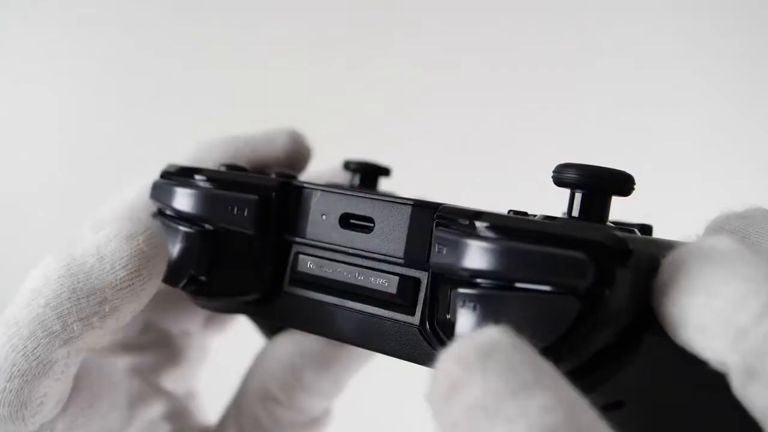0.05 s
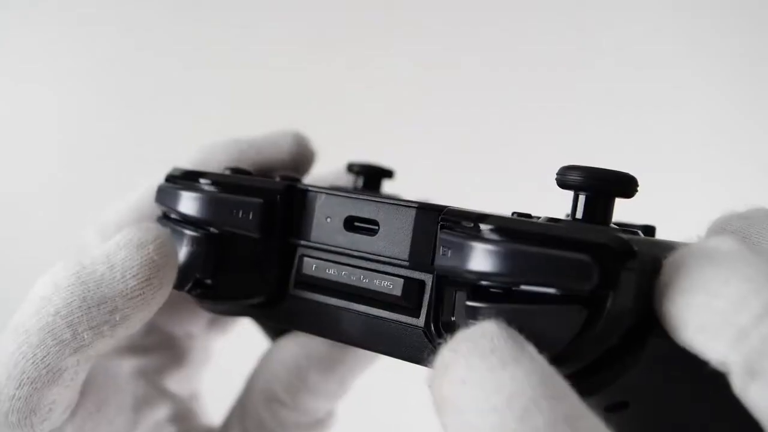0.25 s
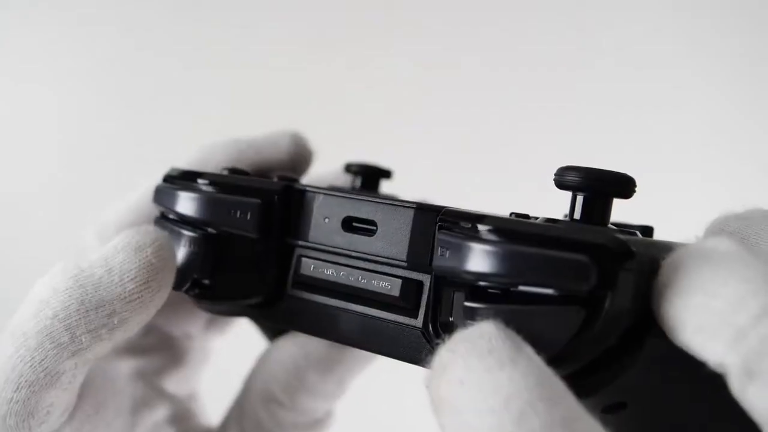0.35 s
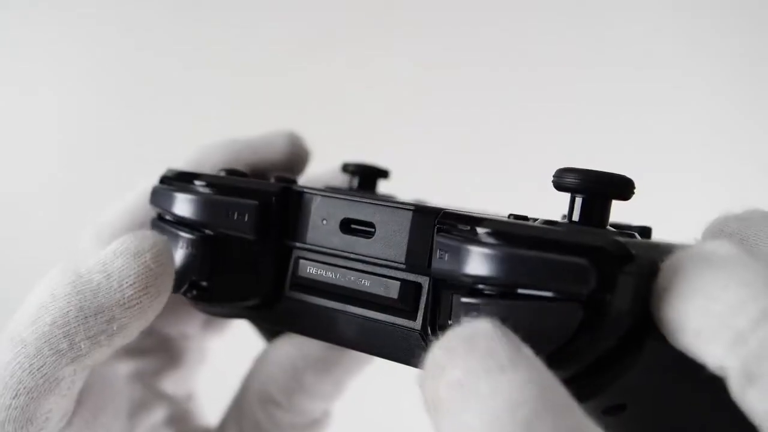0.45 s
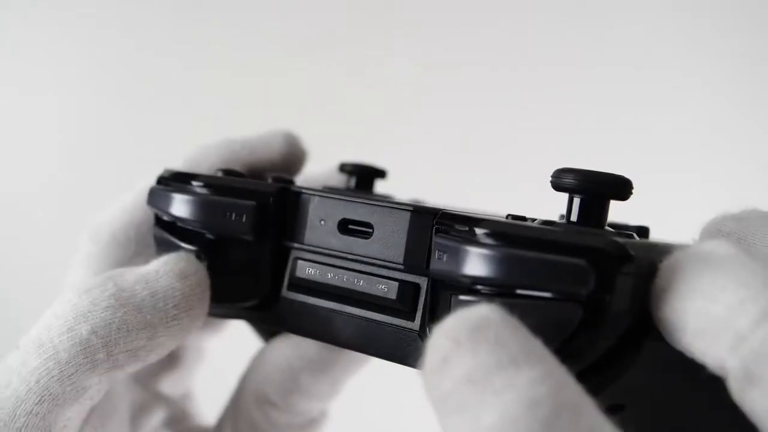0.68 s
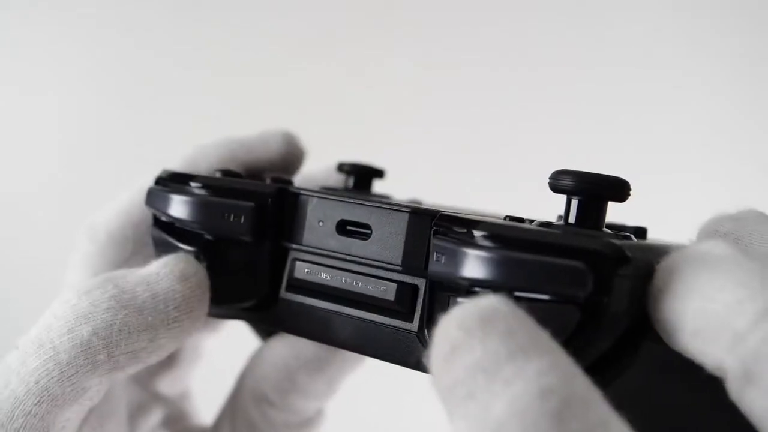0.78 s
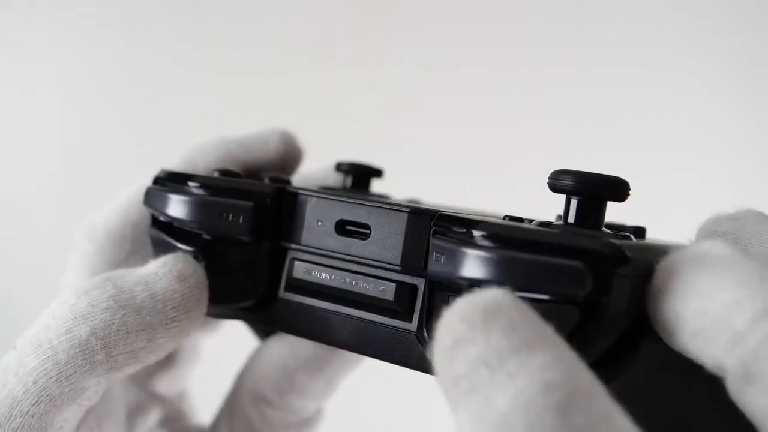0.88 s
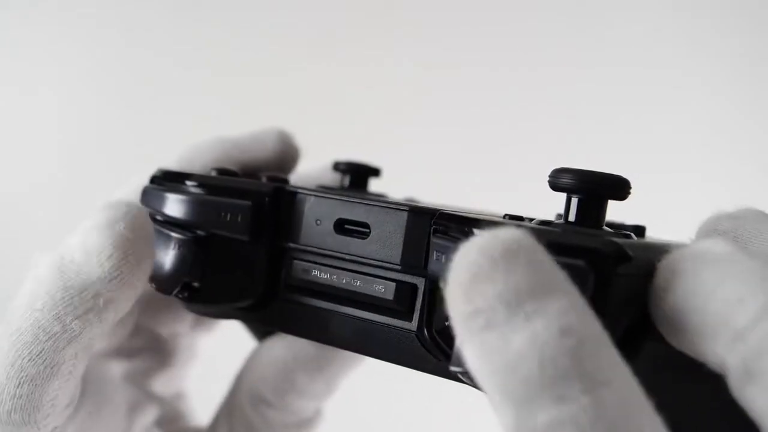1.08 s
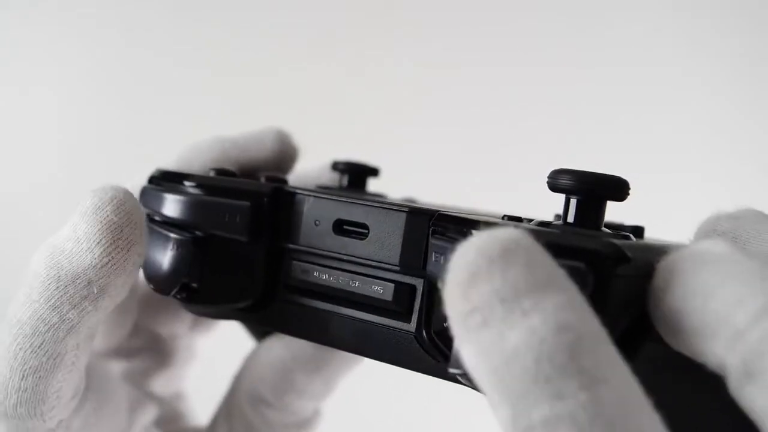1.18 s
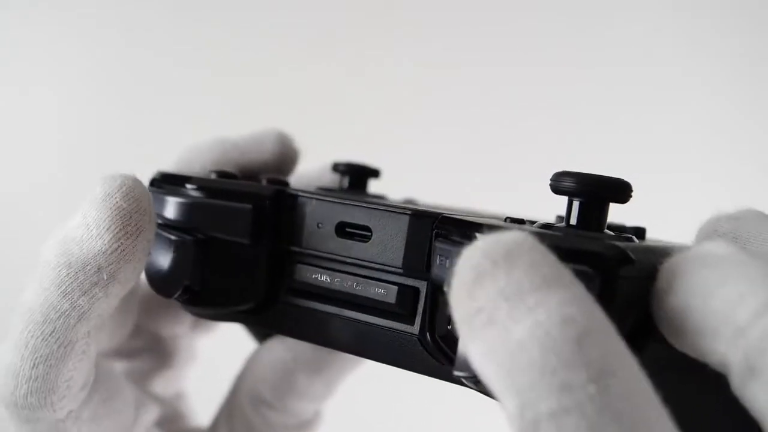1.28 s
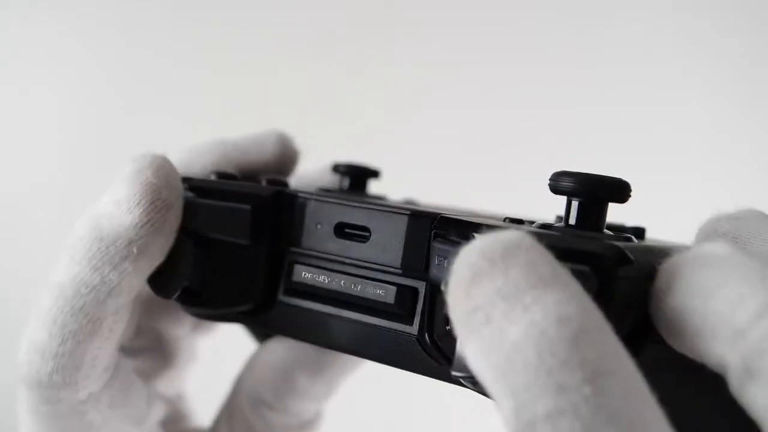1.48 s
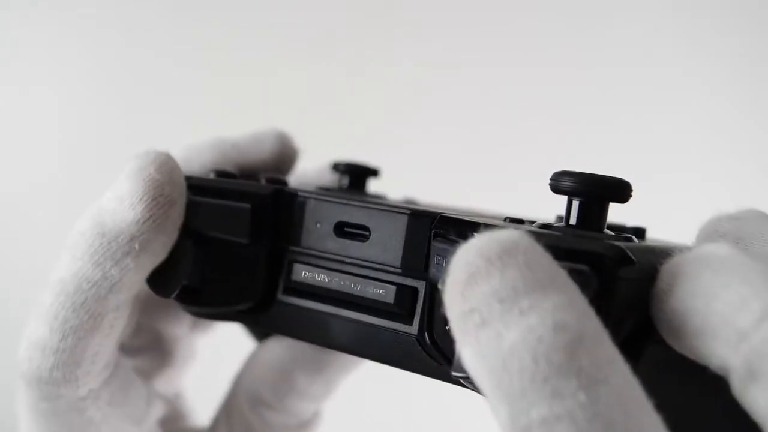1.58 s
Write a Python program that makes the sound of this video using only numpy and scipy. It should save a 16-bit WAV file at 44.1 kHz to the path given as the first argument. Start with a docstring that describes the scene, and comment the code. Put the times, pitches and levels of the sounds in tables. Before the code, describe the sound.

Hard plastic clicks of a handheld controller's triggers, unevenly spaced, over faint room hum and hiss

```python
"""A faint mains hum and the steady rumble and hiss of a room, all sines and coloured noise, run throughout.
Gloved fingers work the triggers and shoulder buttons of a plastic game controller close to the microphone.
A light scuff of noise and a low bump lead into the loudest, sharp click; a soft one follows amid two scuffs.
After another scuff come a bright, a hollow and a dull click, then one last faint scuff. Each click is a set of
ringing shell modes with a noise crack, one rebound and a thud; a small room answers in decaying noise."""
import sys
import numpy as np
from scipy import signal
from scipy.fft import rfft, irfft
from scipy.io import wavfile

SR = 44100
rng = np.random.default_rng(int(sys.argv[2]) if len(sys.argv) > 2 else 0)


def file_out(sig):
    """Save sig as 16-bit WAV at sys.argv[1]."""
    # one column per channel
    cols = np.atleast_2d(sig).T
    # limit, then scale
    lim = np.clip(cols, -1, 1)
    pcm = np.round(lim * 32767).astype(np.int16)
    wavfile.write(sys.argv[1], SR, pcm)


N = 72765  # length of the scene in samples

CLICK_SIZE, ROOM_SIZE = 4096, 16384  # lengths of one click and of the reflections, in samples
SHELL_LOWEST_HZ = 848  # the small shell hardly radiates below this


def from_db(db):
    """Decibels to gain."""
    return 10 ** (np.asarray(db) / 20)


def decay(t60, size):
    """Envelope that loses 60 dB in t60 seconds."""
    seconds = np.arange(size) / SR
    return np.exp(-np.log(1000) * seconds / t60)


def unit_energy(x):
    """Scale to an energy of 1."""
    return x / np.sqrt(np.sum(x ** 2))


def cut(x, hz, kind, order=2):
    """Butterworth low- or high-pass."""
    sos = signal.butter(order, min(hz, .45 * SR), kind, fs=SR, output="sos")
    return signal.sosfilt(sos, x)


def coloured(x, spectrum):
    """Filter a noise by (Hz, dB) points, joined by straight lines over log frequency."""
    hz, db = np.transpose(spectrum)
    bins_hz = np.maximum(np.fft.rfftfreq(len(x), 1 / SR), 1)
    gain = from_db(np.interp(np.log(bins_hz), np.log(hz), db))
    return irfft(rfft(x) * gain, len(x))


def add(out, s, x):
    """Mix x into out at time s in seconds."""
    i = max(int(s * SR), 0)
    out[i:i + len(x)] += x[:len(out) - i]


def stereo(mid, side):
    """Left and right from mid and side."""
    return np.array([mid + side, mid - side])


def hum():
    """Low steady tones of mains and a running appliance: sines whose level wavers slightly."""
    # Hum tones. Each row: frequency in Hz, level in dB rms before the waver.
    tones = [(49.6, -55.5), (112, -60.5), (300.5, -66.5)]
    waver_depth, waver_hz = 0.18, 6  # rms share of the level; its fastest movement
    t = np.arange(N) / SR
    out = np.zeros(N)
    for hz, db in tones:
        # one extra second lets the filter settle
        waver = cut(rng.standard_normal(N + SR), waver_hz, "low")[SR:]
        level = np.sqrt(2) * from_db(db) * (1 + waver_depth * waver / waver.std())
        out += level * np.sin(2 * np.pi * (hz * t + rng.random()))
    return out


def air():
    """Steady rumble and hiss: coloured noise, narrow in the bass and a little wider above."""
    # Colour of the room noise. Each row: frequency in Hz, relative level in dB per Hz.
    noise_colour = [(12, -36), (20, -6.5), (55, -6.5), (130, -3), (193, -11), (310, -14), (357, -18),
                    (527, -18), (1260, -24), (2020, -26.5), (2600, -26), (2910, -29.5), (10500, -37),
                    (13500, -46), (16000, -76)]
    # Width of the room noise. Each row: frequency in Hz, side minus mid in dB.
    noise_width = [(30, -26.5), (120, -22.5), (300, -13), (1000, -7), (12000, -0.5)]
    mid_db = -55  # rms
    mid, side = (coloured(white, noise_colour) for white in rng.standard_normal((2, N)))
    return from_db(mid_db) * stereo(mid, coloured(side, noise_width)) / mid.std()


def reflections():
    """Scatter from nearby surfaces, plus the duller and longer ring of the room, as decaying noise."""
    # Colour of the reflections. Each row: frequency in Hz, gain in dB before levelling.
    reflection_colour = [(300, 9), (1000, -0.5), (2000, 2), (4000, 1.5), (7000, -3), (10000, -2),
                         (16000, -5.5)]
    early_db, early_t60_s = -11.5, 0.11
    late_db, late_t60_s, late_dull_hz = -16.5, 0.24, 7000  # level before the dulling low-pass
    delay_s = .002
    early, late = (coloured(white, reflection_colour) for white in rng.standard_normal((2, ROOM_SIZE)))
    early = from_db(early_db) * unit_energy(early * decay(early_t60_s, ROOM_SIZE))
    late = unit_energy(late * decay(late_t60_s, ROOM_SIZE))
    late = from_db(late_db) * cut(late, late_dull_hz, "low")
    return np.concatenate([np.zeros(int(delay_s * SR)), early + late])


def room(x):
    """The room's answer by convolution, nearly the same in both channels except in the treble."""
    # Width of the reflections. Each row: frequency in Hz, side minus mid in dB.
    reflection_width = [(300, -9.5), (1200, -26), (4000, -17), (8000, -2), (15000, -1)]
    mid = reflections()
    side = coloured(reflections(), reflection_width)
    return stereo(signal.fftconvolve(x, mid)[:N], signal.fftconvolve(x, side)[:N])


def ring(hz, db, t60):
    """One struck mode: a sine that dies away exponentially."""
    t = np.arange(CLICK_SIZE) / SR
    return from_db(db) * np.sin(2 * np.pi * hz * t) * decay(t60, CLICK_SIZE)


def jolt():
    """A low bump: the hardest press jolts the whole controller in the hands, one damped mode."""
    out = np.zeros(N)
    add(out, .212, ring(hz=75, db=-38, t60=0.083))
    return out


def touches():
    """A loose button scuffs briefly against the shell: soft-edged, decaying coloured noise."""
    # Light touches as a finger takes up a button's play.
    # Each row: start in seconds, level in dB before dulling, low-pass corner in Hz.
    scuff_events = [(0.192, -19, 2200), (0.5491, -23.5, 15000), (0.561, -23.5, 2620), (0.733, -25.5, 1510),
                    (1.583, -33.5, 5000)]
    # Colour of a scuff. Each row: frequency in Hz, relative level in dB per Hz.
    scuff_colour = [(500, -18), (1000, 13), (2000, 6), (4000, 2.5), (7000, -10), (10000, -7.5),
                    (16000, -7.5)]
    t60_s, attack_s = 0.035, 0.00065
    out = np.zeros(N)
    attack = 1 - np.exp(-np.arange(CLICK_SIZE) / SR / attack_s)
    envelope = decay(t60_s, CLICK_SIZE) * attack
    for s, db, dull_hz in scuff_events:
        noise = coloured(rng.standard_normal(CLICK_SIZE), scuff_colour)
        scuff = unit_energy(noise * envelope)
        add(out, s, from_db(db) * cut(scuff, dull_hz, "low"))
    return out


def crack(dull_hz):
    """The burst of dense, short modes at a hard plastic contact, made of decaying noise."""
    # Colour of the crack. Each row: frequency in Hz, relative level in dB per Hz.
    crack_colour = [(900, -2), (2000, 6), (3500, -2), (5000, -1), (6300, 0), (7100, -10.5), (8200, -5.5),
                    (9500, -5.5), (12000, -13.5), (13500, -11), (15000, -13), (16500, -45)]
    t60_s = 0.012
    noise = coloured(rng.standard_normal(CLICK_SIZE), crack_colour)
    burst = unit_energy(noise * decay(t60_s, CLICK_SIZE))
    return cut(burst, dull_hz, "low", order=1)


def struck(modes):
    """A plastic part's answer to one blow; successive modes swing in opposite directions."""
    return sum((-1) ** k * ring(*mode) for k, mode in enumerate(modes))


def all_round(click):
    """The click as radiated in all directions: its power peaks smoothed over frequency, its lows cut."""
    blur_hz = 110.37  # the shell radiates other modes in each direction, so the room hears them blurred
    power = np.abs(rfft(click)) ** 2
    hz = np.fft.rfftfreq(CLICK_SIZE, 1 / SR)
    kernel = np.exp(-.5 * ((hz - SR / 4) / blur_hz) ** 2)
    smooth_power = np.convolve(power, kernel / kernel.sum(), "same")
    pulse = irfft(np.sqrt(smooth_power))
    # the zero-phase pulse wraps around the start, so move it later
    pulse = np.roll(pulse, int(SR / blur_hz / 2))
    return cut(pulse, SHELL_LOWEST_HZ, "high", order=6)


def clicks():
    """Each button strikes its stop with ring, crack and thud, and rebounds; gives direct sound and room feed."""
    # Buttons hitting their stops. Each row: kind of click, start in seconds, level in dB,
    # rebound delay in seconds, rebound level in dB, crack level in dB before dulling,
    # crack low-pass corner in Hz, thud level in dB before its filters, room feed in dB.
    strikes = [ ("sharp", 0.2181, 0, .0021, -12, 2.8, 8600, -8, -0.64),
               ("soft", 0.556, -20, 0.00108, -4, 4.3, 19000, 8, -0.33),
               ("bright", 0.7666, -3.5, .0020, -7.5, .5, 11400, -6, -0.79),
               ("hollow", 1.0961, -9, .0007, -6.5, -.5, 14300, -2, -1.7),
               ("dull", 1.3321, -13, 0.001188, -7.5, -1.2, 11000, 11.3, -2), ]
    # Modes of each button and stop. Each row: frequency in Hz, level in dB relative to the click,
    # 60 dB decay time in seconds.
    modes = {
        "sharp": [(904, -32, 0.04), (1114, -16, 0.042), (1105, -7.5, 0.015), (1380, -10, 0.0085),
                  (1600, -15, 0.021), (1930, -15, 0.034), (2097, -17, 0.035), (2574, -12, 0.016),
                  (2950, -27.5, 0.054), (3580, -13, 0.046), (4105, -12.5, 0.0069), (4890, -24.5, 0.028),
                  (5410, -21.5, 0.036), (6150, -16.5, 0.0047)],
        "soft": [(930, -23, .033), (1123, -12, .01), (1570, -16, .023), (1900, -15, .04), (2060, -29, .14),
                 (2224, -12, .017), (2553, -19, .028), (3480, -20, .02), (3770, -12, .008),
                 (4260, -23, .025), (6150, -28, .03)],
        "bright": [(1030, -16, .017), (1185, -9.5, .0075), (1400, -22, .034), (1680, -13.5, .032),
                   (2180, -18, .018), (2430, -25, .03), (2720, -17.5, .04), (3020, -18, .013),
                   (3585, -18, .027), (3957, -19.5, .025), (4323, -25, .025), (4900, -24, .014),
                   (5500, -22, .013), (6300, -24, .012)],
        "hollow": [(1040, -24, .035), (1140, -22, .035), (1410, -11.5, .036), (1647, -17, .036),
                   (1885, -14, .033), (2050, -17, .038), (2370, -20, .028), (2740, -29, .035),
                   (3040, -32, .03), (3750, -18, .016), (4450, -22, .012), (5000, -22, .012),
                   (5480, -18, .018), (6100, -16.5, .009)],
        "dull": [(1030, -17.5, .028), (1292, -13, .032), (1500, -21, .03), (1640, -26, .03),
                 (1910, -21, .033), (2125, -19, .045), (2550, -15, .022), (3260, -29, .018),
                 (3920, -22, .014), (4350, -26, .014), (6450, -26, .01)],
    }
    direct, to_room = np.zeros((2, N))
    # the thud is an impulse kept between two corners
    thud = cut(signal.unit_impulse(CLICK_SIZE), 860, "low")
    thud = cut(thud, 220, "high")
    for kind, s, db, rebound_s, rebound_db, crack_db, dull_hz, thud_db, room_db in strikes:
        body = struck(modes[kind])
        blow = body + from_db(crack_db) * crack(dull_hz)
        add(blow, rebound_s, from_db(rebound_db) * body)
        radiated = cut(blow, SHELL_LOWEST_HZ, "high", order=8)
        click = from_db(db) * (radiated + from_db(thud_db) * thud)
        add(direct, s, click)
        add(to_room, s, from_db(room_db) * all_round(click))
    return direct, to_room


def scene():
    """The controller straight ahead, in its room; clicks and scuffs feed the reflections."""
    direct, to_room = clicks()
    scuffs = touches()
    background = hum() + air()
    return background + room(to_room + scuffs) + jolt() + scuffs + direct


def record(dry):
    """A steep elliptic low-pass cuts off the top."""
    cutoff_hz = 16200
    sos = signal.ellip(10, .1, 80, cutoff_hz, fs=SR, output="sos")  # .1 dB ripple, 80 dB rejection
    return signal.sosfilt(sos, dry)


dry = scene()
out = record(dry)
file_out(out)
```